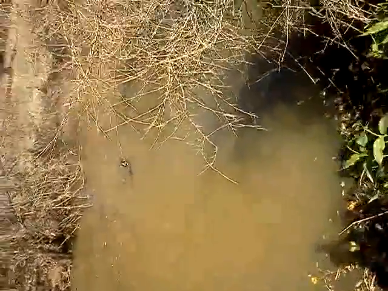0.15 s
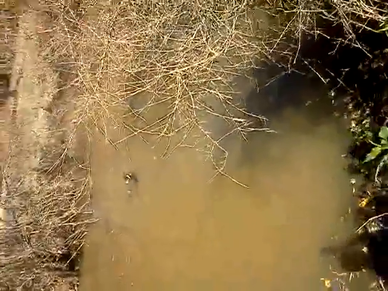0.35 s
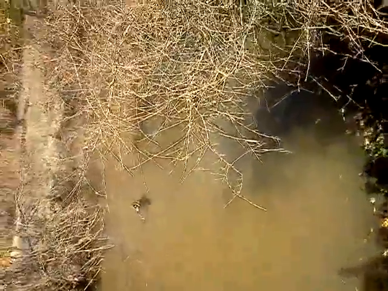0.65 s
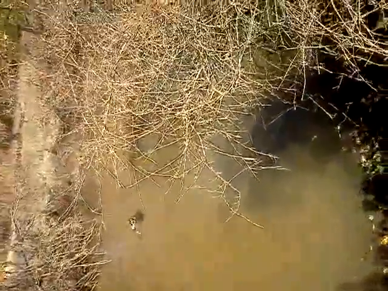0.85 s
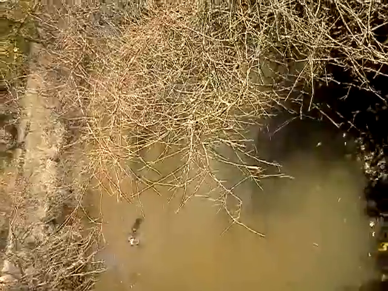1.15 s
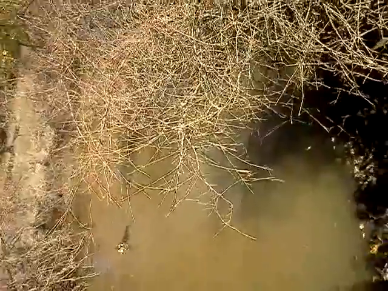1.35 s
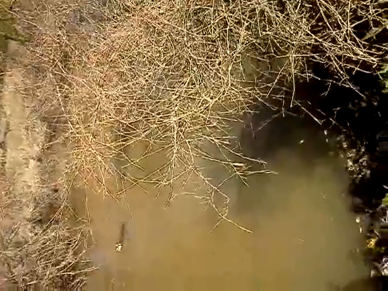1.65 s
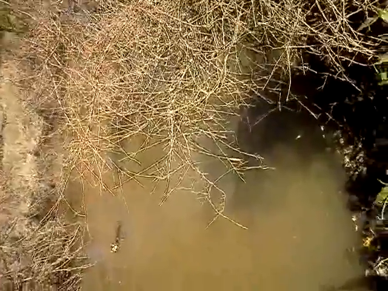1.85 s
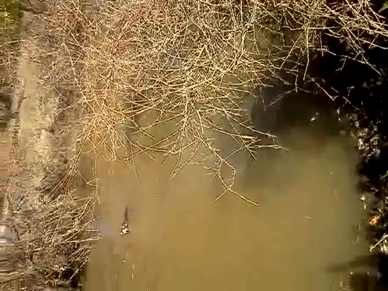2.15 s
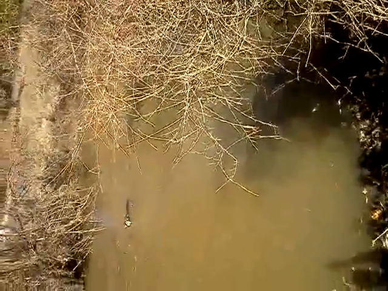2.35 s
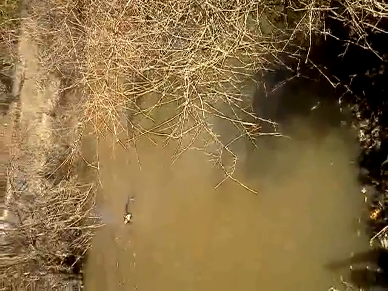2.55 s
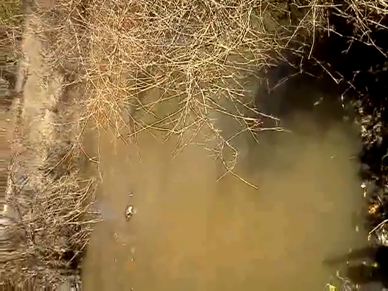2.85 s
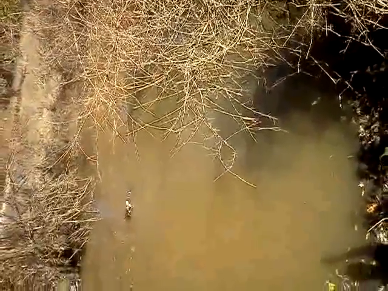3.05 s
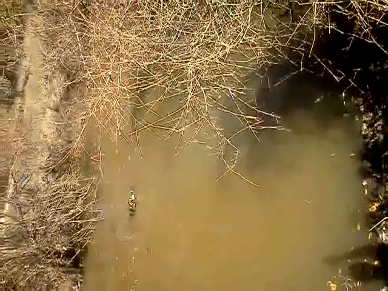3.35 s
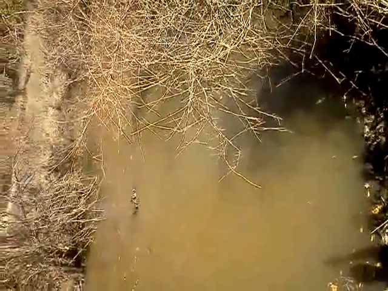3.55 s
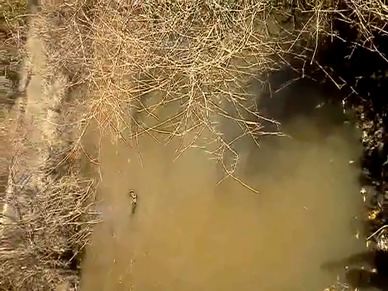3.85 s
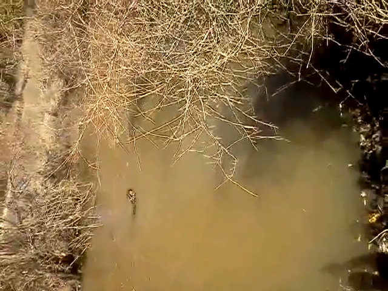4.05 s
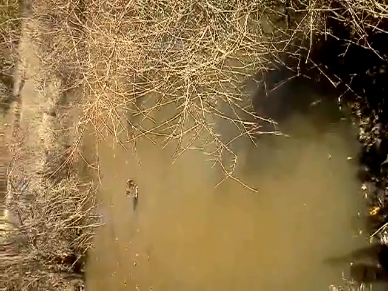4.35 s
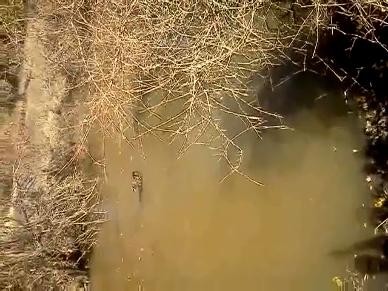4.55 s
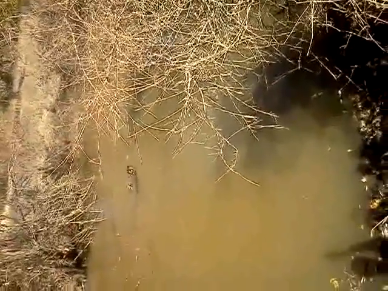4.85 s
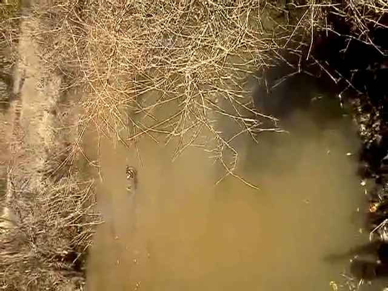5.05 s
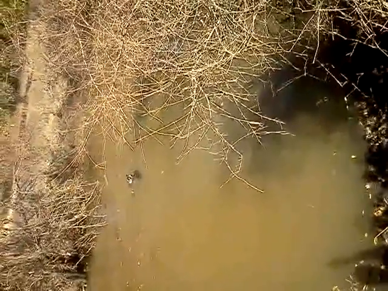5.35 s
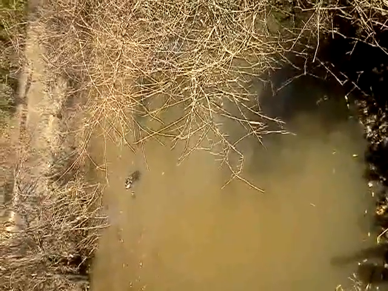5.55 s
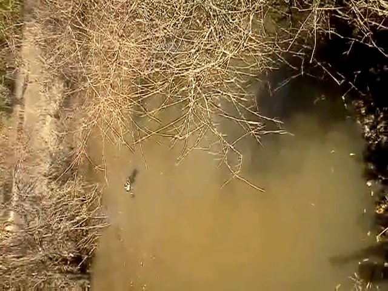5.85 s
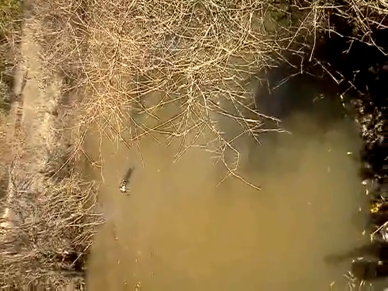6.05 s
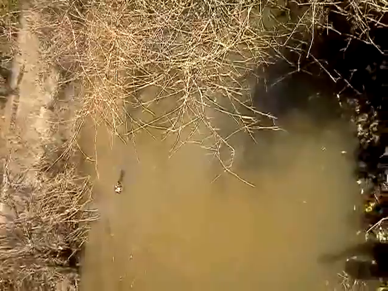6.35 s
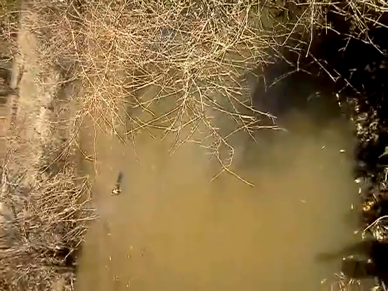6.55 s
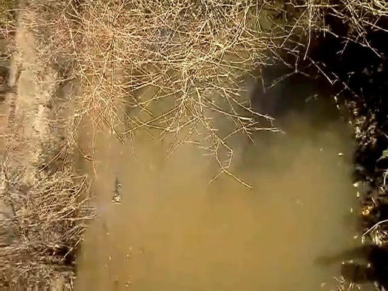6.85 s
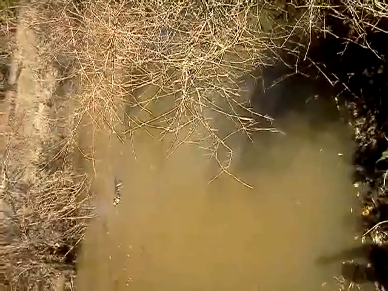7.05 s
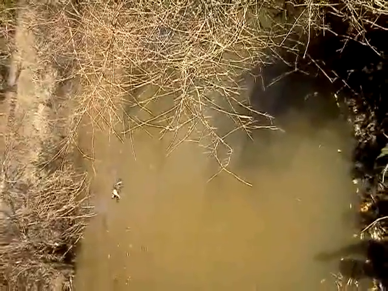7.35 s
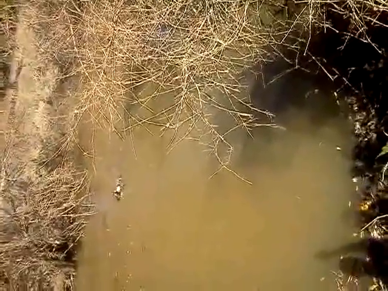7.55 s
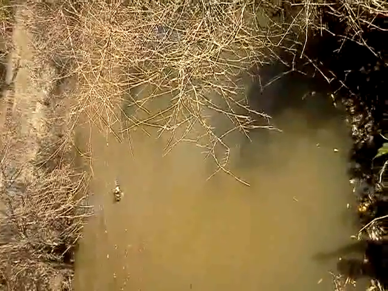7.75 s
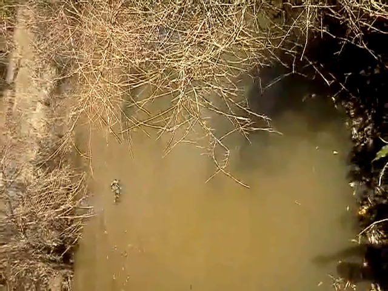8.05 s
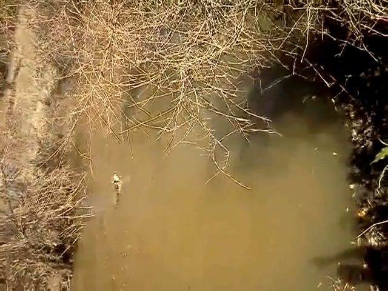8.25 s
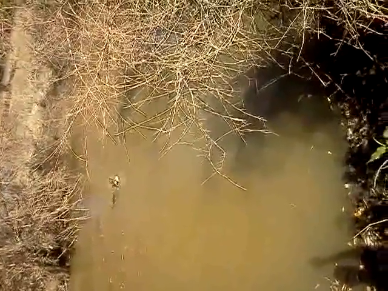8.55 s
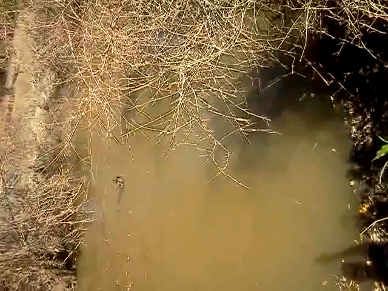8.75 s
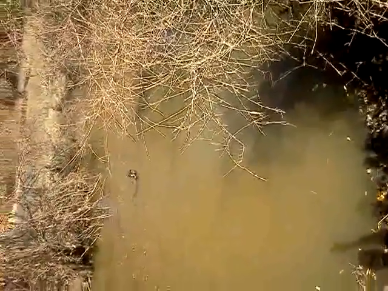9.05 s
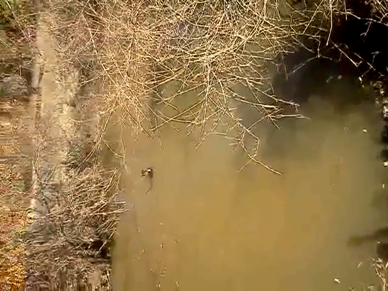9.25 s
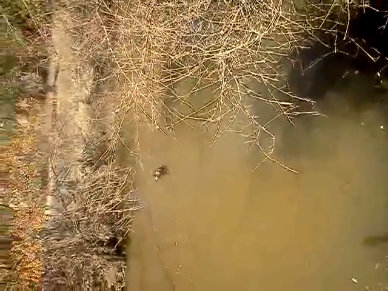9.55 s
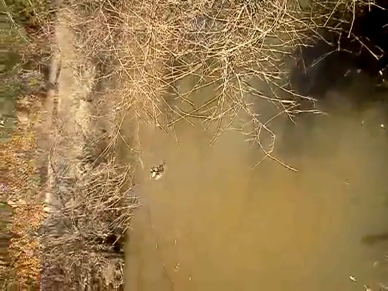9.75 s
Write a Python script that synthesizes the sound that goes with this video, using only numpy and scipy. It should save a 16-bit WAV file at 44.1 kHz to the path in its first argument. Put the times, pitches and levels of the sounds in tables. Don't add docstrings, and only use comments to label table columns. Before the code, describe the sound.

A dog yips in short, cracking high cries that echo off creek banks, with wind pops, ticking twigs and a final gasp and whine.

```python
import sys
import numpy as np
from scipy import signal
from scipy.fft import rfft, irfft, next_fast_len
from scipy.io import wavfile
from scipy.ndimage import uniform_filter1d

SR = 44100
rng = np.random.default_rng(int(sys.argv[2]) if len(sys.argv) > 2 else 0)


def gain_from_decibels(decibels):
    exponent = np.asarray(decibels, float) / 20
    return 10 ** exponent


def bounce(signal):
    frames = np.transpose(np.atleast_2d(signal))
    limited = np.clip(frames, -1, 1)
    pcm = np.round(limited * 32767).astype(np.int16)
    wavfile.write(sys.argv[1], SR, pcm)


N = 436590


def evened(x):
    return x / np.sqrt(np.mean(x ** 2) + 1e-20)


def read(points, hz):
    f, value = np.transpose(points)
    return np.interp(np.log(hz + 1), np.log(f + 1), value)


def level(rows):
    return gain_from_decibels(np.interp(np.arange(N) / SR, *np.transpose(rows)))


def add(mix, s, sound):
    part = mix[round(s * SR):][:len(sound)]
    part += sound[:len(part)]


def colour(x, points):
    size = next_fast_len(len(x) + SR // 10)
    gain = gain_from_decibels(read(points, np.fft.rfftfreq(size, 1 / SR)))
    return irfft(rfft(x, size) * gain, size)[:len(x)]


def resonate(x, hz, width):
    turn = np.exp(2j * np.pi * np.cumsum(hz * np.ones(len(x))) / SR)
    r = np.exp(-np.pi * width / SR)
    return 2 * (turn * signal.lfilter([1 - r], [1, -r], x / turn + 1e-18)).real


def spread(rows):
    s, *columns = np.transpose(rows)
    s = np.maximum.accumulate(s)
    t = np.arange(s[0], s[-1], 1 / SR)
    return [s[0]] + [np.interp(t, s, c) for c in columns]


def knocks(events, cycles, rise):
    out = np.zeros(N)
    for (s, db, hz), phase in zip(events, rng.random((len(events), 1))):
        turns = np.arange(round(.04 * SR)) * hz / SR
        shape = (1 - np.exp(-(turns / rise) ** 2)) * np.exp(-turns / cycles)
        add(out, s, gain_from_decibels(db) * shape / shape.max() * np.sin(2 * np.pi * (turns + phase)))
    return out


def drone():
    # t/s, level/dB
    hum_curve = [(0, -59), (2, -63), (5.4, -63), (6.4, -52.5), (7.3, -57), (7.7, -48), (8.0, -47.5),
                 (8.06, -56), (8.8, -52.5), (9.3, -52), (9.9, -54)]
    hum_hz, width_hz = 373, 130
    hum = resonate(rng.standard_normal(N), hum_hz, width_hz)
    hum = resonate(hum, hum_hz, 2 * width_hz)
    return level(hum_curve) * evened(hum)


def hiss():
    # t/s, level/dB
    hiss_curve = [(0, -31.5), (.3, -42.5), (.6, -37.5), (2, -44.5), (5.3, -43.5), (6.5, -43.5),
                  (9.45, -43.5), (9.9, -30)]
    # f/Hz, level per Hz/dB
    hiss_shape = [(25, -13), (60, -3), (270, -18), (450, -6.5), (1100, -9), (1600, -7.5), (2600, -3.5),
                  (3800, -16.5), (5200, -15)]
    a, b, patches = rng.standard_normal((N // 128 + 5, 257, 3)).T
    patches = uniform_filter1d(patches, size=5, axis=0)
    patches = evened(uniform_filter1d(patches, size=20, axis=1))
    shape_db = read(hiss_shape, np.fft.rfftfreq(512, 1 / SR))[:, None]
    z = (a + 1j * b) * gain_from_decibels(shape_db + 2.2 * patches)
    noise = signal.istft(z, nperseg=512, noverlap=384)[1][:N]
    return level(hiss_curve) * gain_from_decibels(2.0) * evened(noise)


def flurries():
    # start t/s, length/s, peak/dB, f/Hz
    flurry_list = [(1.453, 0.043, -20, 335), (2.189, .015, -30.5, 282), (2.484, .013, -26, 274),
                   (2.543, 0.017, -13, 291), (2.595, 0.029, -13.5, 380), (2.656, 0.049, -19, 326),
                   (2.962, .018, -24.5, 361), (3.051, .024, -15, 310), (3.684, .052, -12, 418),
                   (3.881, .015, -17, 301), (3.9, 0.029, -15, 388), (3.951, .019, -22, 374),
                   (4.03, .01, -17.5, 437), (4.506, .027, -18, 442), (4.659, .018, -9.5, 397),
                   (4.794, 0.033, -10.5, 354), (4.862, 0.031, -10.5, 436), (4.94, .032, -18.5, 372),
                   (5.067, .017, -22.5, 300)]
    gap_s = .013
    sag_db, scatter_db, pitch_scatter, pitch_sag = -0.94, 5, 0.24, 0.25
    pops = []
    chances = rng.uniform(-1, 1, size=(len(flurry_list), 8, 2))
    for (s, length, db, hz), chance in zip(flurry_list, chances):
        steps = max(round(length / gap_s), 1)
        for k, (a, b) in enumerate(chance[:steps + 1]):
            later = k > 0
            pop_db = db + sag_db * k + scatter_db * a * later
            pop_hz = hz * (1 + (pitch_scatter * b - pitch_sag) * later)
            pops.append((s + length * k / steps, pop_db, pop_hz))
    return pops


def wind():
    # t/s, level/dB
    gust_curve = [(0, -49.5), (2.4, -45), (3.4, -48.5), (3.9, -34.5), (4.9, -38), (5.3, -50.5),
                  (5.6, -56.5), (9.4, -61.5), (9.9, -52.5)]
    # t/s, peak/dB, f/Hz
    stray_pops = [(.194, -20.5, 240), (.359, -28, 269), (1.534, -26, 236), (1.795, -24, 233),
                  (1.913, -27.5, 265), (1.956, -26, 253), (2.12, -28, 330), (2.329, -30, 270),
                  (2.581, -13.5, 262), (2.644, -14, 263), (2.785, -27.5, 238), (3.002, -9.5, 318),
                  (3.018, -19.5, 368), (3.663, -13, 261), (3.752, -8, 377), (3.803, -17, 251),
                  (3.824, -13, 258), (3.991, -27.5, 294), (4.067, -12.5, 255), (4.539, -11.5, 262),
                  (4.552, -6, 354), (4.581, -20.5, 255), (4.611, -27, 325), (4.638, -16, 276),
                  (4.699, -26.5, 277), (5.004, -26.5, 322), (5.121, -29.5, 267)]
    lumps = gain_from_decibels(6.8 * evened(uniform_filter1d(rng.standard_normal(N), size=900)))
    rumble = resonate(lumps * rng.standard_normal(N), 260, 300)
    rumble = resonate(rumble, 180, 600)
    return level(gust_curve) * evened(rumble) + knocks(stray_pops + flurries(), 1.25, 0.3)


def twigs():
    # t/s, peak/dB, f/Hz
    ticks = [(.1168, -2, 1930), (.1279, -24, 2657), (.158, -11, 2580), (.1952, -10, 2680),
             (.2046, -18, 2770), (.2366, -18.5, 2100), (.3688, -13, 2510), (.6963, -9, 2370),
             (.7203, -13.5, 2550), (.743, -19, 2200), (.751, -9, 2250), (.766, -3, 3050),
             (2.1509, -15.5, 2500), (3.0021, -27, 2670), (6.855, -7, 1450), (9.418, -25.5, 2040),
             (9.836, -12, 1305), (9.896, -18.5, 910)]
    splinter_s, splinter_db = 0.0058, -14.5
    snaps = knocks(ticks, 1.4, 0.44)
    t = np.arange(1200) / SR
    trail = gain_from_decibels(splinter_db) * np.exp(-t / splinter_s) * rng.standard_normal(len(t))
    trail = trail * (rng.random(len(t)) < .3)
    return snaps + signal.fftconvolve(snaps, trail)[:N]


def rattle(rows, uneven_db, throb=0):
    throb_hz = 60.6
    s, db, low_hz, high_hz, high_db = spread(rows)
    air, lumps = rng.standard_normal((2, 20000))[:, :len(db)]
    air = air * gain_from_decibels(uneven_db * np.clip(evened(uniform_filter1d(lumps, size=130)), -2, 2))
    since_flap = throb_hz * np.arange(len(db)) / SR % 1
    air = air * (1 + throb * np.exp(-since_flap / .3))
    low = evened(resonate(resonate(air, low_hz, 210), low_hz, 800))
    high = evened(resonate(resonate(air, high_hz, 550), high_hz, 1200))
    middle = evened(resonate(air, 1500, 700))
    sound = evened(low + gain_from_decibels(high_db) * high + gain_from_decibels(-9.5) * middle)
    return s, gain_from_decibels(np.minimum(db, -16.5)) * sound * signal.windows.tukey(len(db), .1)


def brush(near):
    # t/s, level/dB, lower resonance f/Hz, upper resonance f/Hz, upper share/dB
    rustles = [
        [(0.08, -22, 1500, 2200, 2.2), (0.126, -21, 1460, 2410, 5.9), (0.3, -43.5, 1600, 2530, 20.4)],
        [(2.18, -45, 1800, 2290, 1.6), (2.242, -24.5, 1790, 2240, 1.4), (2.39, -42.5, 1550, 2250, 1.8)],
    ]
    for rows in rustles:
        add(near, *rattle(rows, 4.8))


def gasp(near):
    # t/s, level/dB, lower resonance f/Hz, upper resonance f/Hz, upper share/dB
    breath = [(9.51, -41, 700, 1450, -11.5), (9.56, -26.5, 960, 2200, -16), (9.585, -21.5, 1000, 2100, -6),
              (9.62, -6.5, 973, 1830, -2.5), (9.7, -12.5, 1076, 2260, -4), (9.74, -25, 1070, 2450, -1),
              (9.8, -44, 1040, 2360, -6)]
    add(near, *rattle(breath, 1.6, throb=.8))


def squeals():
    # start t/s, length/s, from f/Hz, to # f/Hz, level/dB
    glides = [(.782, 0.034, 1300, 2100, -16.5), (.83, 0.032, 2400, 2500, -17), (.81, .05, 1400, 2100, -8.5),
              (.8, .06, 1050, 1150, -17), (3.072, 0.022, 1100, 1700, -40), (3.135, .035, 1650, 1720, -8),
              (3.095, 0.05, 1350, 1500, -17), (1.36, .045, 2720, 3000, -23),
              (1.262, .025, 2200, 3100, -13.5), (4.295, .04, 1050, 1250, -12.5),
              (4.335, 0.022, 1800, 1850, -15.5), (3.105, .04, 2200, 2450, -9),
              (3.15, .045, 2480, 2200, -13), (3.11, .04, 1830, 1900, -13), (4.1, 0.041, 2040, 2420, -12),
              (4.105, .055, 780, 900, -13), (5.54, .03, 1440, 1400, -12), (5.58, 0.023, 1420, 1400, -18.5),
              (5.58, 0.04, 2050, 2100, -20), (4.12, 0.04, 1870, 1600, -7.5),
              (4.365, 0.058, 1720, 1700, -12), (4.37, .05, 2680, 2880, -21.5),
              (5.49, 0.036, 1870, 2280, -8.5), (5.535, .03, 1800, 2100, -9), (5.528, 0.016, 780, 876, -9),
              (7.335, 0.021, 2300, 2650, -23), (8.203, .025, 2370, 2400, -10.5),
              (8.205, 0.031, 1880, 1867, -11), (8.212, 0.024, 2300, 2030, -10.5),
              (8.245, .062, 2650, 2700, -15.5), (7.303, 0.036, 1750, 2420, -19.5),
              (7.34, .045, 2130, 2060, -20.5), (7.56, .025, 2100, 2080, -36.5),
              (8.995, 0.025, 700, 706, -41), (0.94, 0.033, 2150, 2250, -16.5), (5.5, .06, 2400, 2850, -15),
              (9.545, .025, 1300, 1420, -29.5), (8.225, 0.027, 2180, 2050, -14.5),
              (.47, .045, 1850, 1700, -40), (.5, .11, 1460, 1420, -48), (.59, .06, 1120, 1040, -46),
                   (6.655, 0.017, 2550, 2750, -19), (6.666, .02, 2900, 3120, -21),
                   (6.672, .02, 2050, 1700, -15), (6.75, .035, 2300, 2450, -16.5),
                   (6.83, .035, 2380, 2520, -20), (6.84, .028, 2950, 3050, -23),
                   (6.825, 0.027, 1400, 1450, -17), (9.61, .04, 880, 1080, -20.5),
                   (9.65, .08, 1020, 1090, -24), (9.685, .05, 2330, 2450, -23),
                   (4.155, .025, 1520, 1430, -11.5), (3.1, .02, 1900, 2150, -12.5),
                   (5.458, .016, 500, 560, -33), (1.25, .02, 2150, 3000, -17.5)]
    pitch_waver, flutter_db = .012, 3
    out = np.zeros(N)
    draws = rng.standard_normal((60, 2, 5000))
    for (s, length, from_hz, to_hz, db), (waver, flutter) in zip(glides, draws):
        size = round(length * SR)
        waver = evened(uniform_filter1d(waver, size=200))[:size]
        flutter = evened(uniform_filter1d(flutter, size=250))[:size]
        hz = np.linspace(from_hz, to_hz, size) * (1 + pitch_waver * waver)
        swing = np.sqrt(2) * gain_from_decibels(db + flutter_db * flutter) * signal.windows.tukey(size, .5)
        add(out, s, swing * np.cos(2 * np.pi * np.cumsum(hz) / SR))
    return out


def mouth(opening):
    shut_hz, open_hz = 600, 2500
    return shut_hz * (open_hz / shut_hz) ** opening


def partials(hz, effort_db, opening):
    mouth_db_per_octave, fold_tilt_db = -20.5, -3
    muzzle_hz, muzzle_db_per_octave = 2780, -120
    k = np.arange(1, 4)[:, None]
    shape_db = mouth_db_per_octave * abs(np.log2(k * hz / mouth(opening))) + fold_tilt_db * k
    shape_db = shape_db + muzzle_db_per_octave * np.log2(np.maximum(k * hz / muzzle_hz, 1))
    return effort_db + shape_db - shape_db.max(axis=0)


def yip(rows):
    # f/Hz, width/Hz, level/dB
    throat = [(850, 500, -6), (1400, 500, 0), (1950, 600, 1), (2550, 600, -7), (3300, 800, -14)]
    # from t/s, to t/s
    hoarse_spells = [
        (.77, .815),
        (.835, .87),
        (1.25, 1.285),
        (1.305, 1.325),
        (1.346, 1.368),
        (3.08, 3.14),
        (4.095, 4.165),
        (4.285, 4.41),
        (5.45, 5.51),
        (8.18, 8.222),
    ]
    rasp_db_per_octave = -8
    s, hz, effort_db, opening, over_db = spread(rows)
    waver, flutter, air = rng.standard_normal((3, 32000))[:, :len(hz)]
    t = s + np.arange(len(hz)) / SR
    hoarse = sum((t > start) & (t < end) for start, end in hoarse_spells)
    chaos = 1 / (1 + gain_from_decibels(3 - over_db))
    chaos = np.clip(.55 * chaos + .4 * hoarse, 0, 1)

    shaky_hz = hz * (1 + (.008 + .08 * chaos ** 2) * evened(uniform_filter1d(waver, size=150)))
    turn = 2 * np.pi * np.cumsum(shaky_hz) / SR
    tone = 0
    for k, db in enumerate(partials(hz, effort_db, opening)):
        tone = tone + np.sqrt(2) * gain_from_decibels(np.minimum(db, 0)) * np.cos((k + 1) * turn)
    tone = tone * gain_from_decibels((1.5 + 6 * chaos) * evened(uniform_filter1d(flutter, size=250)))

    glide = np.sqrt(hz / hz.mean())
    stray_hz = np.linspace(1000, 2550, 14) + rng.uniform(-60, 60, size=14)
    strays = sum(resonate(air, f * glide, 100) for f in stray_hz)
    puffs = .6 * air * (1 + .7 * np.cos(turn)) + evened(strays)
    rasp = 0
    for f, width, db in throat:
        mouth_db = rasp_db_per_octave * abs(np.log2(f / mouth(opening)))
        rasp = rasp + gain_from_decibels(db + mouth_db) * resonate(resonate(puffs, f, width), f, 2 * width)
    rasp_db = np.minimum(effort_db + over_db + 2 * hoarse, -5)
    rasp = gain_from_decibels(rasp_db + 2.0) * evened(rasp)
    edge = signal.windows.tukey(len(hz), min(1, 0.012 * SR / len(hz)))
    return s, np.transpose([gain_from_decibels(5) * tone, rasp] * edge)


def dog():
    # t/s, pitch f/Hz, effort/dB, mouth opening/0-1, rasp over tone/dB
    first_yips = [
        [(.769, 696.6, -22.5, 0.3, 1), (.779, 728.5, -16.5, 0.15, 5.5), (.79, 688.3, -14, 0.58, 7),
         (.805, 699, -4.5, 0.5, 2), (.83, 749, -0.5, 0.77, -5.5), (.874, 711, -19, 0.47, 2),
         (.895, 766, -14.5, 0.03, 13.5)],
        [(.98, 405.7, -29.5, 0, -0.5), (1.012, 636, -28.5, 0, -0.5), (1.024, 733.7, -8, 0.03, 2.5),
         (1.04, 778.5, -14, 0.6, 2), (1.042, 1340, -2, 0.77, -6.5), (1.098, 1617, 6, 0.81, -24),
         (1.135, 1399, -18, 0.7, -3.5), (1.138, 721, -25.5, 0.6, 7), (1.165, 647, -18.5, 0, 4)],
        [(1.17, 470.4, -37, 0, 0.5), (1.21, 400, -33, 0, 0.5), (1.252, 700, -26.5, 0, 6.5),
         (1.256, 1121, -19, 0.65, 8), (1.29, 1288, -1.5, 0.8, -7.5), (1.313, 1278, -23.5, 0.73, 0),
         (1.334, 1370, -4.5, 0.84, -14.5), (1.345, 1329, -13, 0.93, -4.5), (1.358, 1053, -21.5, 0.69, 3.5),
         (1.364, 761, -17.5, 0.15, 1.5), (1.395, 696, -17.5, 0.3, 5.5)],
    ]
    # t/s, pitch f/Hz, effort/dB, mouth opening/0-1, rasp over tone/dB
    harsh_yips = [
        [(3.088, 902, -27, 0.17, 11), (3.097, 758, -16, 0.49, 5), (3.104, 734.6, -21.5, .7, 12.5),
         (3.116, 804, -9.5, 0.82, 1), (3.137, 804, -13, 0.93, -1.5), (3.139, 933, -19.5, 0.3, 9),
         (3.16, 828, -15, 0.27, 5), (3.178, 800, -11, 0.27, -1), (3.187, 727, -8.5, 0.3, 2.5)],
        [(4.078, 660.3, -31, 0.049, -11), (4.095, 682.3, -14.5, 0.069, 4), (4.108, 722.2, -8.5, 0.77, 3),
         (4.133, 796.7, -18, 0.84, 4.5), (4.15, 802.6, -17, 0.42, 5), (4.168, 735, -14.5, 0.63, -6.5),
         (4.172, 803, -12, 0.23, 0), (4.2, 702, -11.5, 0.24, -3.5), (4.22, 696, -41.5, .3, 14)],
        [(4.272, 436.4, -24.5, 0.032, -10.5), (4.298, 480.8, -26.5, 0.055, -1), (4.325, 479.2, -27, 0.14, 9.5),
         (4.328, 647, -20, 0.48, 3.5), (4.345, 712, -15.5, 0.48, -1.5), (4.374, 731.2, -1, 0.71, -9.5),
         (4.395, 726, -19, 0.47, -1), (4.419, 677, -17, 0.28, 3), (4.45, 795, -15.5, 0.41, 2)],
    ]
    # t/s, pitch f/Hz, effort/dB, mouth opening/0-1, rasp over tone/dB
    jumping_yips = [
        [(5.472, 561.3, -46, .1, 4.5), (5.484, 603, -33.5, 0.28, 10.5), (5.494, 681.2, -22, 0.44, 13.5),
         (5.511, 691.3, -6, 0.47, -1.5), (5.533, 726, -11.5, 0.65, 1.5), (5.564, 699.4, -7, 1, 18.5),
         (5.567, 838, -13.5, 0.18, -1.5), (5.58, 754, -10, 0.077, -2), (5.6, 640, -17, 0.11, -10)],
        [(6.654, 803, -10, 0.58, -14), (6.684, 1019, -6.5, .4, -2), (6.686, 1577, -7.5, 1, -1.5),
         (6.698, 1528, 7.5, 0.79, -22), (6.72, 1371, -13.5, 0.81, 1), (6.721, 1795, -3.5, 0.95, 3.5),
         (6.738, 1841, -8, 1, 0.5), (6.74, 1428, -14.5, 0.82, -15), (6.765, 1449, -11.5, 1, 18.5)],
        [(6.76, 640, -23, 0.15, 6), (6.775, 719, -21.5, 0.15, 2.2), (6.803, 655, -26, 0.11, 3)],
        [(6.805, 1052, -23.5, 0.35, 4), (6.83, 1113, -23.5, .4, 4), (6.845, 1083, -24, .4, 4.5),
         (6.858, 1069, -18.5, 0.4, 2.5), (6.878, 1112, -23, 0.41, 1.5)],
    ]
    # t/s, pitch f/Hz, effort/dB, mouth opening/0-1, rasp over tone/dB
    last_yips = [
        [(7.29, 426.6, -51.5, 0.055, -15), (7.312, 650.7, -7, .05, -19), (7.325, 791.6, -6.5, .15, -15),
         (7.35, 846, -11.5, 0.16, -8.5)],
        [(7.333, 1323, -13.5, 0.89, 1.5), (7.355, 1327, -13.5, 0.858, -3), (7.378, 1287, -32, 0.51, 3)],
        [(7.366, 950, -10, 0.19, -6), (7.39, 740, -35, .2, 20.5)],
        [(8.183, 590.5, -39, .05, 1), (8.203, 600, -29, 0.13, 6), (8.209, 557, -21, 0.57, 8),
         (8.22, 525, -20, 0.16, 9), (8.222, 1202, -14.5, 0.45, -1), (8.24, 1210, -10.5, 0.45, 0),
         (8.243, 1720, -12.5, 0.52, -7), (8.254, 1790, -11.5, 0.62, -12), (8.265, 1760, -18, 0.73, -16.5)],
        [(8.259, 1253, -6.5, 0.47, 1), (8.28, 1315, -10, 0.62, -12), (8.29, 1315, -15, 0.72, -17),
         (8.302, 1302, -14, 0.55, -14), (8.303, 617, -18.5, 0.59, -10), (8.309, 676, -14, 0.063, 2.5),
         (8.33, 667, -27, 0.49, 5)],
    ]
    # t/s, pitch f/Hz, effort/dB, mouth opening/0-1, rasp over tone/dB
    whines = [
        [(.465, 365, -50, .1, 12), (.52, 395, -47, .01, 6), (.6, 412, -48, -.2, -4), (.75, 370, -49, -.2, 2)],
        [(9.866, 370, -28, -.4, -12.5), (9.885, 461, -21, -0.34, -8.5), (9.94, 523, -25, -0.15, -2)],
    ]
    voice = np.zeros((N, 2))
    for rows in first_yips + harsh_yips + jumping_yips + last_yips + whines:
        add(voice, *yip(rows))
    return voice.T


def banks(x):
    # f/Hz, time to fall 60 dB/s
    ring_times = [(300, 0.097), (700, 0.8), (1400, 1.176), (2500, 1.023), (4000, 0.94)]
    # delay/s, level/dB
    single_echoes = [
        (.047, -20.5),
        (.075, -28.5),
        (.11, -24),
    ]
    # f/Hz, gain/dB
    bank_colour = [(400, 7), (1300, -2), (2000, 0), (2700, 1.5), (4500, 4)]
    far_db, far_longer = -22.5, 1.8
    taps = np.zeros(2 * SR)
    at = np.arange(300, 2 * SR - 20, 20)
    taps[at + rng.integers(0, 20, len(at))] = rng.choice([-1., 1.], len(at))
    hz, t, z = signal.stft(taps, SR, nperseg=256)
    fall_db = -60 * t / read(ring_times, hz)[:, None]
    build_up = 1 - np.exp(-t / 0.0037)
    z = z * (gain_from_decibels(fall_db) + gain_from_decibels(far_db + fall_db / far_longer)) * build_up
    tail = signal.istft(z, SR, nperseg=256)[1]
    tail = gain_from_decibels(-15.0) * tail / np.linalg.norm(tail)
    for s, db in single_echoes:
        add(tail, s, gain_from_decibels(np.array([db])))
    return colour(signal.fftconvolve(x, tail)[:N], bank_colour)


def scene():
    # t/s, tone/dB, rasp and squeal/dB
    bank_send = [(.8, -0.5, 3), (1.05, -1.5, 1), (1.1, 3.5, 5.5), (1.27, -2.5, -0.5), (1.34, -2.5, -3),
                 (3.1, 1, -0.5), (4.15, 1.5, 1), (4.35, 0, 0.5), (5.5, -5.5, 5), (5.58, -0.5, 2),
                 (6.7, -0.5, 0), (7.32, -5, -2), (7.35, 0.5, -1.5), (7.38, -1, 0.5), (8.23, -2.5, -3.5),
                 (8.28, 7, 1.5), (8.31, -1, -1), (9.6, 0, -2.5)]
    tone, rasp = dog()
    near = np.zeros(N)
    gasp(near)
    brush(near)
    weather = wind() + hiss() + drone()
    high = squeals()
    near = near + twigs()
    tone_sent = level([(row[0], row[1]) for row in bank_send])
    rough_sent = level([(row[0], row[2]) for row in bank_send])
    rough = gain_from_decibels(1.5) * rasp + gain_from_decibels(4) * high
    echo = banks(tone_sent * tone + rough_sent * rough + 1.1 * near)
    return (tone + rasp + high + echo + near + weather)[None]


def roll_off(x):
    return signal.sosfilt(signal.butter(12, 15830, fs=SR, output="sos"), x)


def record(dry):
    # f/Hz, gain/dB
    guard = [(3400, 0), (4000, -7), (4800, -2.5), (6500, -50.5)]
    # f/Hz, gain/dB
    mic = [(40, -15), (150, -4), (300, 2.5), (3400, -1), (4000, -8.5), (4850, -27.5), (5150, -45),
           (5300, -102)]
    voice_rate_hz = 8000
    release_s, release_share = .03, 0.76
    power = uniform_filter1d(dry[0] ** 2, size=260) + 1e-12
    keep = np.exp(-1 / (release_s * SR))
    slow_power = signal.lfilter([1 - keep], [1, -keep], power)
    size = np.sqrt(np.maximum(power, release_share * slow_power))
    x = dry[0] / (1 + (size / .5) ** 3.07) ** (1 / 5.86)
    x = x / (1 + abs(x / 1.073) ** 6.26) ** (1 / 1.93)
    x = colour(x, guard)
    x = x * (1 + 2 * np.cos(2 * np.pi * voice_rate_hz * np.arange(N) / SR))
    x = np.clip(colour(x, mic), -.72, .72)
    x = colour(x, [(30, 1.0), (90, 0.5), (9600, -1.5), (10200, -6.0), (15500, -6.0), (15900, -62.0)])
    return roll_off(x[None])


dry = scene()
out = record(dry)
bounce(out)
```